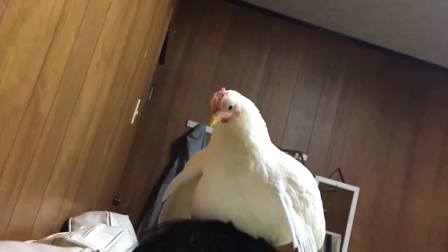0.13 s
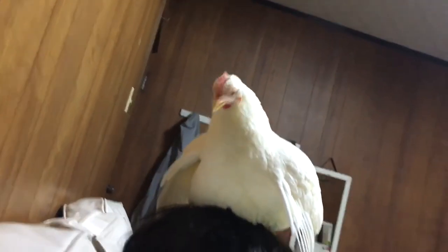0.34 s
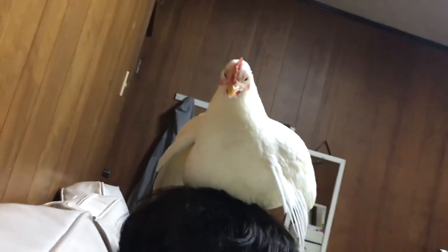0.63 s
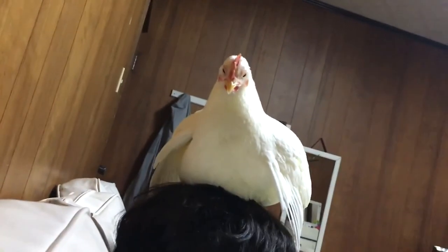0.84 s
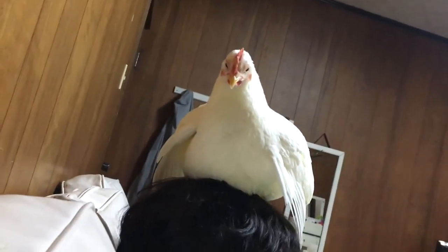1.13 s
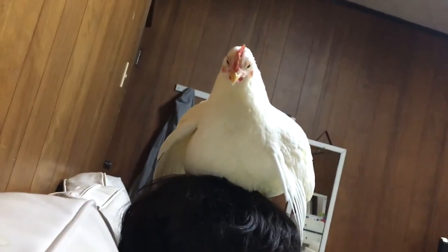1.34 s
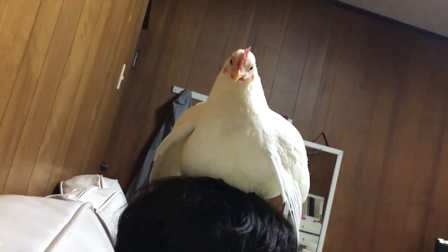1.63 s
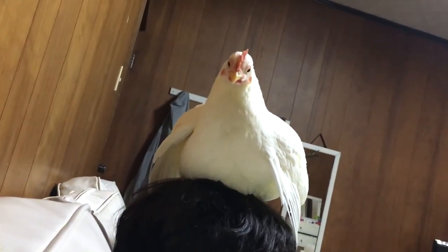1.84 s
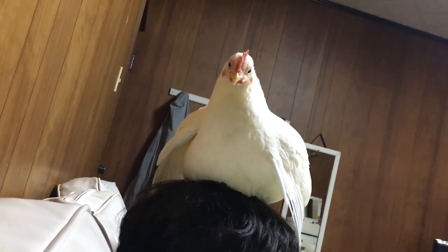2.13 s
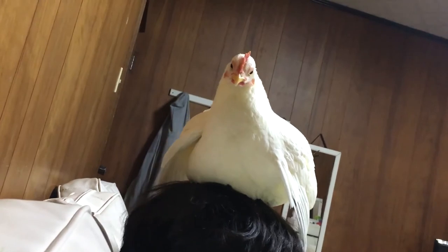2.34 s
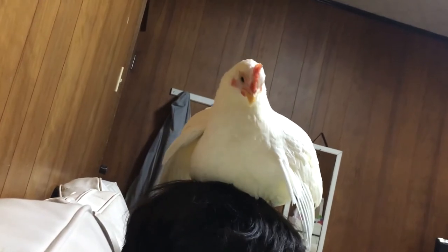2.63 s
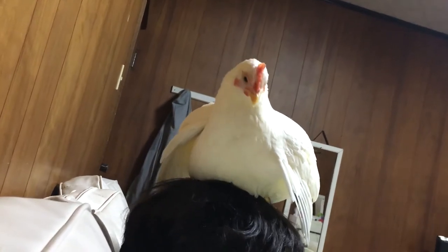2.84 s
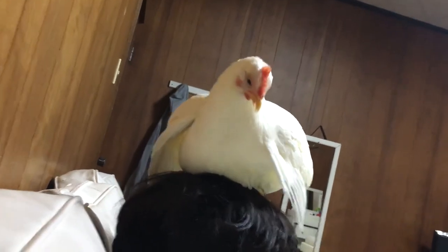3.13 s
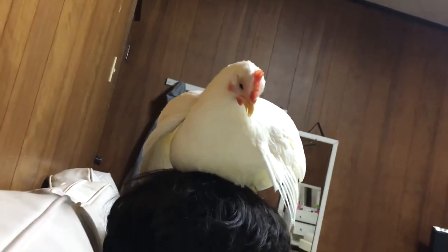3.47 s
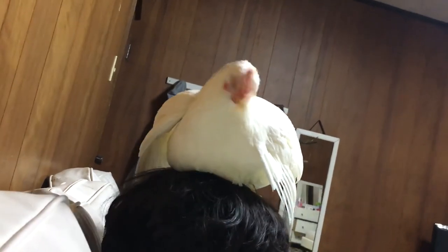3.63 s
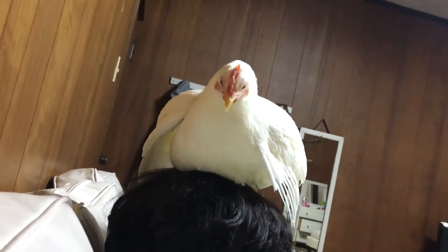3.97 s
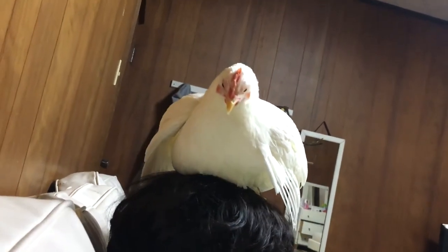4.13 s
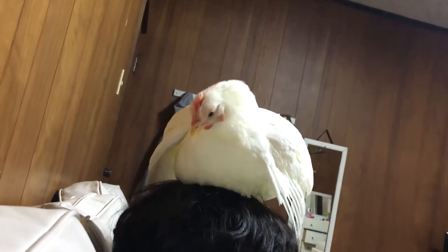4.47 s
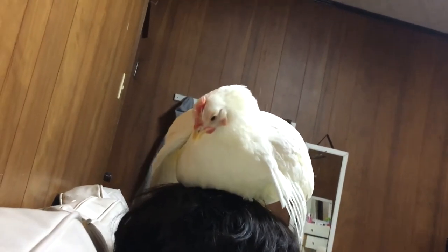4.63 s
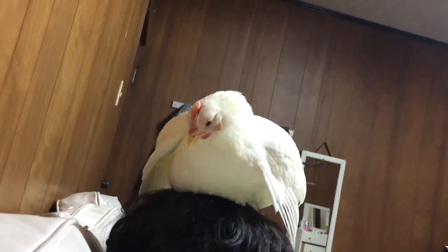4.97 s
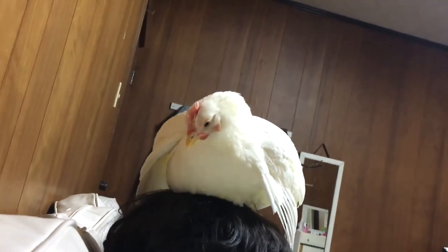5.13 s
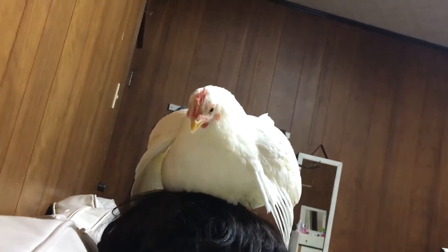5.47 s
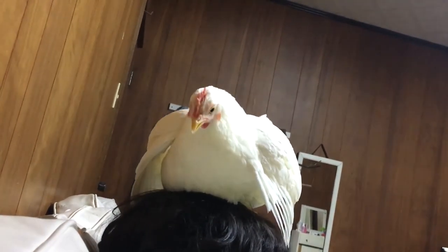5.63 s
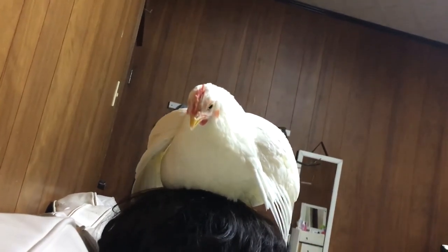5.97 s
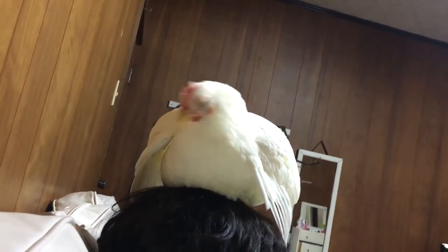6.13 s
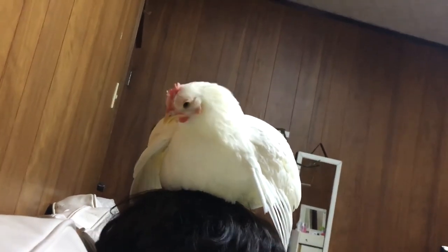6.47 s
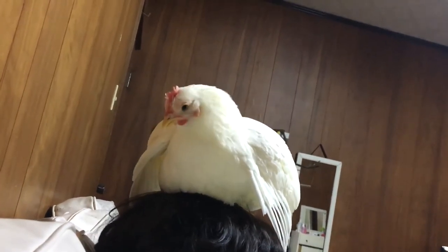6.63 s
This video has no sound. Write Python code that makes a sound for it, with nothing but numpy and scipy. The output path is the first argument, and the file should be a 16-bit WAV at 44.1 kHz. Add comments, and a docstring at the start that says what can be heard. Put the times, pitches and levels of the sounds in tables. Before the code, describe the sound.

Three brief calls from a nearby hen, a couple of seconds apart, mixing soft plaintive whines and clucks over faint indoor hum.

```python
"""A hen, perched close to the microphone, calls three times in a small, quiet, wood-panelled room.
Her breath sets the membranes of the syrinx vibrating; throat and opening beak colour the note.
Each call starts as a thin, airy whine and ends in a short loud cluck; the last trails off in a
rising whimper. Feathers and claws tick faintly, and near the end something bumps softly close by.
Behind her lies the room tone: low rumble, mains hum and hiss."""
import sys
import numpy as np
from scipy import signal
from scipy.fft import rfft, irfft, next_fast_len
from scipy.io import wavfile
from scipy.ndimage import uniform_filter1d

SR = 44100
rng = np.random.default_rng(int(sys.argv[2]) if len(sys.argv) > 2 else 0)


def dump(signal):
    """Clip the signal to [-1, 1] and save it as 16-bit WAV at the path in sys.argv[1]."""
    limited = np.clip(np.atleast_2d(signal).T, -1, 1)
    pcm = np.round(limited * 32767).astype(np.int16)
    wavfile.write(sys.argv[1], SR, pcm)


N = 299924
TIME = np.arange(N) / SR
CUTOFF_HZ, SILENT_DB = 15200, -100

# clucks: start t/s, attack/s, hold/s, glide/s, first f/Hz, last f/Hz, peak level at the syrinx/dB,
# overtone fall/(dB per octave), puff of air/dB
CLUCKS = [(.716, 0.014, 0.0094, .013, 967, 891, -33.5, 0.5, -74),
          (3.437, 0.015, 0.017, 0.027, 538.6, 454, -32, 0.5, -52),
          (5.445, 0.018, .010, 0.023, 514.5, 439, -48.5, 11, -61),
          (5.551, .028, 0.062, 0.055, 524.6, 461, -45.5, 10.5, -61),
          (5.608, .027, 0.0275, 0.029, 493.3, 406.6, -37, 3, -64)]


def hen():
    """The hen at close range: notes from the syrinx, shaped by throat and beak, with her breath on top."""
    # thin held notes (both sides of the syrinx may sound at once): start t/s, length/s, attack/s,
    # first f/Hz, last f/Hz, sag/Hz, first level/dB, last level/dB, overtone fall/(dB per octave),
    # roughness/share of pitch
    whines = [(.33, 0.42, .13, 676, 891, 38, -65, -57.5, 10.5, 0.072),
              (3.10, 0.42, .06, 742, 785, 22, -69.5, -59, 16, .05),
              (3.30, 0.15, .12, 620, 665, 6.5, -74, -69.5, -1, .05),
              (3.249, 0.2, .06, 563, 562, 6, -54, -57, 11.5, .07),
              (5.485, 0.09, .06, 497.4, 533, 11, -53, -59, 11, 0.045),
              (5.79, .105, 0.047, 644, 720, 38.5, -58.5, -64.5, 9, 0.064),
              (5.909, .022, .025, 800, 816, -1.5, -64, -60.5, 7.5, 0.096)]
    # throat resonances with the beak shut, then open: f/Hz, gain/dB
    shut_throat = [(200, -0.5), (450, 0), (700, -3), (1000, 2.5), (1300, -4), (1650, 7.5), (2000, 9),
                   (2300, 2), (2520, -6), (3000, -27), (3500, -19), (4400, -36.5), (5400, -39.5),
                   (14000, -50.5)]
    open_throat = [(200, -5.5), (420, -3.5), (900, -4.5), (1200, 9.5), (1440, 13.5), (1750, 8.5), (2030, 4),
                   (2270, -8.5), (2480, -40), (2950, -31.5), (3500, -31.5), (4400, -50.5), (5400, -22.5),
                   (6600, -52), (14000, -46.5)]
    notes = sum(whine(*row) for row in whines) + sum(cluck(*row[:-1]) for row in CLUCKS)
    air_gain, hiss_gain, opening = airflow()
    voice = opening * colour(notes, open_throat) + (1 - opening) * colour(notes, shut_throat)
    return voice + breath(air_gain, hiss_gain)


def whine(start, length, attack, first_hz, last_hz, sag_hz, first_db, last_db, fall_db, rough):
    """A weak held note: its pitch settles from above, then follows a shallow arc."""
    along = progress(start, length)
    scoop = 0.15 * (1 - progress(start - attack, attack)) ** 2   # comes in 15 % sharp
    arc_hz = first_hz + (last_hz - first_hz) * along - sag_hz * np.sin(np.pi * along)
    level_db = held(start, length, first_db, last_db, attack, release_s=0.02)
    return syrinx(arc_hz * (1 + scoop), level_db, np.full(N, fall_db), rough)


def cluck(start, attack, hold, glide, first_hz, last_hz, peak_db, fall_db, bounces_per_s=47):
    """A short hard note, brightest at its peak; the pitch drops, then bounces."""
    effort_db = cluck_effort(start, attack, hold)
    drop_hz = first_hz + (last_hz - first_hz) * progress(start, glide)
    bounce = 0.035 * np.sin(np.pi * bounces_per_s * np.maximum(TIME - start - glide, 0)) ** 2
    return syrinx(drop_hz * (1 + bounce), peak_db + effort_db, fall_db - 0.5 * effort_db)


def cluck_effort(start, attack, hold, fade_db=5.5, release_s=0.005):
    """Effort in dB relative to the cluck's peak: a rounded attack, a slackening hold, a sudden end."""
    rising = 20 * np.maximum((start + attack - TIME) / attack, 0) ** 2.4
    fading = fade_db * progress(start + attack, hold) ** 1.6
    ending = 20 * np.maximum(TIME - start - attack - hold, 0) / release_s
    return np.maximum(-rising - fading - ending, SILENT_DB)


def syrinx(pitch, level_db, fall_db, rough=0.054, shimmer_db=2.0, firm_db=-45, taut_hz=600):
    """One note of the vibrating membranes: unsteady when blown weakly, clean when blown hard."""
    on = level_db > SILENT_DB
    pitch, level_db, fall_db = pitch[on], level_db[on], fall_db[on]
    weak = np.clip((firm_db - level_db) / 20, 0, 1)
    jitter = (0.003 + rough * weak) * drift(450)[on]
    quaver = 0.01 * weak * drift(35)[on]
    pitch = pitch * (1 + jitter + quaver)
    phase = 2 * np.pi * np.cumsum(pitch) / SR
    harmonic = np.arange(1, 25)[:, None]
    # taut membranes no longer slap shut, so high notes lose their upper partials
    taut_loss_db = 30 * np.maximum(np.log2(pitch / taut_hz), 0) * np.clip(harmonic / 2 - 1, 0, 2) ** 2
    unsteady_db = level_db + shimmer_db * weak * drift(45)[on]
    partials = from_db(unsteady_db - fall_db * np.log2(harmonic) - taut_loss_db)
    partials *= harmonic * pitch < CUTOFF_HZ
    # the vibration needs a few cycles to swell or die
    partials = uniform_filter1d(partials, size=160, axis=1, mode="constant")
    note = np.zeros(N)
    note[on] = np.sqrt(2) * np.sum(partials * np.cos(harmonic * phase), 0)
    return note


def airflow(shut_s=0.15, puff_hiss_db=-18.5):
    """Strength of the air in the throat and of the hiss at the beak, and how far the beak is open."""
    # pushes of air, the beak opening during each: start t/s, length/s, first level/dB, last level/dB,
    # beak hiss relative to the air/dB, final opening/(0-1)
    pushes = [(.22, 0.48, -71, -63, -11, 0.77), (3.058, 0.4, -64, -62.5, -11.5, 0.86),
              (5.443, 0.14, -65, -71.5, -8, 0.54), (5.763, 0.096, -65.5, -75, -19, 0),
              (5.895, 0.042, -65, -70, -18, 0.07), (6.063, .035, -69.5, -74, -20, 0.1)]
    air = hiss = opening = 0
    for start, length, first_db, last_db, hiss_db, widest in pushes:
        flow = from_db(held(start, length, first_db, last_db, attack_s=0.035, release_s=0.04))
        air, hiss = air + flow, hiss + flow * from_db(hiss_db)
        shutting = 1 - progress(start + length, shut_s) ** 2
        opening = opening + widest * progress(start, length) ** 0.56 * shutting
    for start, attack, hold, *_, puff_db in CLUCKS:
        puff = from_db(puff_db + cluck_effort(start, attack, hold))
        air, hiss = np.hypot(air, puff), np.hypot(hiss, puff * from_db(puff_hiss_db))
    return air, hiss, np.clip(opening, 0, 1)


def breath(air_gain, hiss_gain, air_flutter_db=1.2, hiss_flutter_db=1.0, rasp=0.5):
    """Turbulent air leaves in fast uneven spurts: hoarse in the throat, hissing and wheezy at the beak."""
    # resonances of the air in the throat, then of the hiss at the beak: f/Hz, relative level/dB
    air_colour = [(200, -19), (400, 2.5), (750, -3.5), (950, -7), (1300, -2), (1600, -1.5), (1800, -4),
                  (2050, 1), (2400, -9), (2900, -20.5), (3500, -18.5), (4700, -28.5), (5450, -17),
                  (6500, -37.5)]
    beak_colour = [(2500, -23.5), (4100, -4), (5500, 1.5), (7400, -12.5), (8600, -8.5), (10300, -7.5),
                   (11000, -10), (13100, 1.5), (15500, -6.5)]
    # narrow resonances of the wheeze: f/Hz, width/Hz, level relative to the hiss/dB
    wheeze_bands = [(5480, 330, -6), (10900, 350, -9), (13100, 500, -12)]
    spurts = rms_one(np.maximum(1 + rasp * drift(150), 0) * rng.standard_normal(N))
    air = air_gain * from_db(air_flutter_db * drift(40)) * rms_one(colour(spurts, air_colour))
    wheeze = np.zeros(N)
    for hz, width, db in wheeze_bands:
        band = signal.butter(2, [hz - width / 2, hz + width / 2], "band", fs=SR, output="sos")
        wheeze += from_db(db) * rms_one(signal.sosfilt(band, spurts))
    hiss = hiss_gain * from_db(hiss_flutter_db * drift(30)) * rms_one(noise(beak_colour) + wheeze)
    return air + hiss


def ticks(decay_s=0.006):
    """Tiny dry scratches as the hen shifts on her perch."""
    # touches of feathers and claws: t/s, level/dB
    touches = [(0.179, -58), (0.489, -56), (1.027, -54.5)]
    envelope = sum(from_db(db) * (TIME >= s) * np.exp(-np.abs(TIME - s) / decay_s) for s, db in touches)
    return envelope * noise([(300, 9.5), (1800, -15), (3000, -8.5), (6000, -12), (14000, -27)])


def bump():
    """A dull double contact close to the microphone, ringing briefly."""
    # soft knocks: t/s, strength/dB, contact cut-off f/Hz
    knocks = [(6.496, -36, 1520), (6.4990, -28.5, 515)]
    # modes of the bumped object: f/Hz, gain/dB, t60/s
    modes = [(140, -10.5, 0.049), (348, 2.5, 0.0077), (620, 4.5, 0.0053), (970, 0, 0.0057),
             (1850, -11, 0.0045)]
    force = np.zeros(N)
    for s, strength_db, soft_hz in knocks:
        click = from_db(strength_db) * (np.arange(N) == round(s * SR))
        force += signal.sosfilt(signal.butter(2, soft_hz, fs=SR, output="sos"), click + 1e-18)
    return sum((-1) ** k * from_db(db) * ring(force, hz, t60) for k, (hz, db, t60) in enumerate(modes))


def room(direct, t60=0.3, tail_db=-18, tail_start_s=0.0058):
    """The panelled room adds a few early echoes and a short diffuse tail to the close sound."""
    # first reflections off ceiling and walls: delay t/s, level/dB
    echoes = [(.0095, -29), (0.0177, -33), (0.0249, -15.5)]
    # colour the walls give the tail: f/Hz, gain/dB
    walls = [(100, 2), (500, 4), (1400, 6.5), (2200, 1.5), (5000, -6), (15000, -10.5)]
    tail = rng.standard_normal(N) * from_db(-60 * TIME / t60) * (TIME > tail_start_s)
    response = from_db(tail_db) * colour(tail / np.sqrt(np.sum(tail ** 2)), walls)
    for delay, db in echoes:
        response[round(delay * SR)] += from_db(db)
    return direct + signal.fftconvolve(direct, response)[:N]


def room_tone(rumble_db=-60, hiss_db=-69, hum_trim_db=-2.5, waver_db=4.0, wander_rad=0.44):
    """Steady rumble and hiss behind the hen, with a wavering mains hum."""
    # spectra of the rumble and the hiss: f/Hz, relative level/dB
    rumble_colour = [(12, -53), (25, -26.5), (34, -18), (47, 1.5), (66, -4.5), (84, -5.5), (130, -7.5),
                     (165, -11), (250, -15), (410, -16.5), (490, -25), (800, -28), (1400, -52),
                     (4000, -75.5)]
    hiss_colour = [(300, 6.5), (750, 3), (1060, 7.5), (1650, 0), (2200, 2), (2750, -2.5), (3700, -1.5),
                   (5000, -7), (5600, -4.5), (7700, -8), (8800, -5), (10500, -10.5), (11300, -7.5),
                   (14500, -12)]
    # hum tones: f/Hz, level before the trim/dB
    hum_tones = [(59.2, -66), (118.4, -65.5), (301.5, -71.5)]
    hum = np.zeros(N)
    for hz, db in hum_tones:
        amplitude = np.sqrt(2) * from_db(db + hum_trim_db + waver_db * drift(2.4))
        hum += amplitude * np.sin(2 * np.pi * hz * TIME + wander_rad * drift(2))
    return from_db(rumble_db) * noise(rumble_colour) + from_db(hiss_db) * noise(hiss_colour) + hum


def from_db(db):
    """Decibels to gain."""
    return 10 ** (np.asarray(db) / 20)


def rms_one(x):
    """Scale to unit power."""
    return x / np.sqrt(np.mean(x ** 2) + 1e-20)


def progress(start, length):
    """Runs from 0 to 1 during an event."""
    return np.clip((TIME - start) / length, 0, 1)


def held(start, length, first_db, last_db, attack_s, release_s):
    """Level in dB: a steady swell or fade, with 20 dB of rise per attack_s and of fall per release_s."""
    outside = np.maximum(start - TIME, 0) / attack_s + np.maximum(TIME - start - length, 0) / release_s
    ramp_db = first_db + (last_db - first_db) * progress(start, length)
    return np.maximum(ramp_db - 20 * outside, 2 * SILENT_DB)


def drift(rate_hz, step=40, settle=2000):
    """Smooth random wander of unit spread, mostly slower than rate_hz."""
    pole = np.exp(-2 * np.pi * rate_hz * step / SR)
    white = rng.standard_normal(N // step + settle + 2)
    slow = signal.lfilter([1], [1, -2 * pole, pole * pole], white)[settle:]
    return np.interp(np.arange(N) / step, np.arange(len(slow)), rms_one(slow))


def colour(x, points):
    """Causal (minimum-phase) filter through points of f/Hz, gain/dB."""
    size = 2 * next_fast_len(N)
    hz, db = np.transpose(points)
    grid_hz = np.maximum(np.arange(size // 2 + 1) * SR / size, 1)
    gain = from_db(np.interp(np.log(grid_hz), np.log(hz), db))
    cepstrum = irfft(np.log(gain))
    cepstrum[1:size // 2] *= 2
    cepstrum[size // 2 + 1:] = 0
    return irfft(rfft(x, size) * np.exp(rfft(cepstrum)))[:N]


def noise(points):
    """Coloured noise of unit power."""
    return rms_one(colour(rng.standard_normal(N), points))


def ring(x, hz, t60):
    """One damped mode: a unit click sets a sine of height 1 ringing."""
    radius, angle = from_db(-60 / (t60 * SR)), 2 * np.pi * hz / SR
    return signal.lfilter([0, np.sin(angle)], [1, -2 * radius * np.cos(angle), radius ** 2], x + 1e-18)


def scene():
    """The hen in her room, on one close microphone."""
    return (room(hen() + ticks()) + bump() + room_tone())[None]


def record(dry):
    """A steep low-pass takes off the highest treble."""
    return signal.sosfilt(signal.ellip(10, .2, 70, CUTOFF_HZ, fs=SR, output="sos"), dry)


dry = scene()
out = record(dry)
dump(out)
```